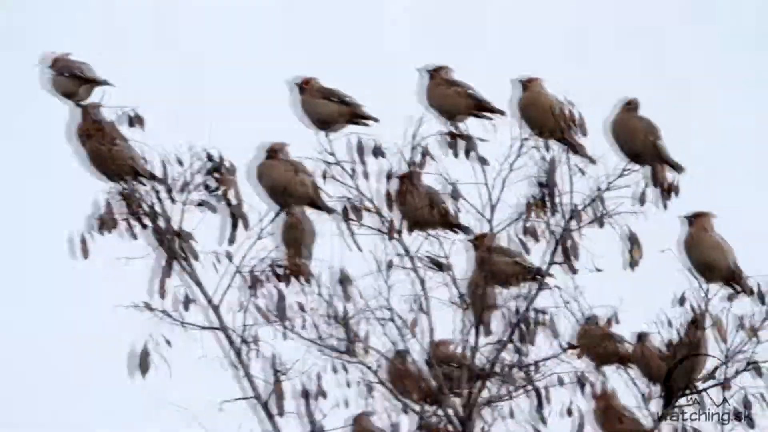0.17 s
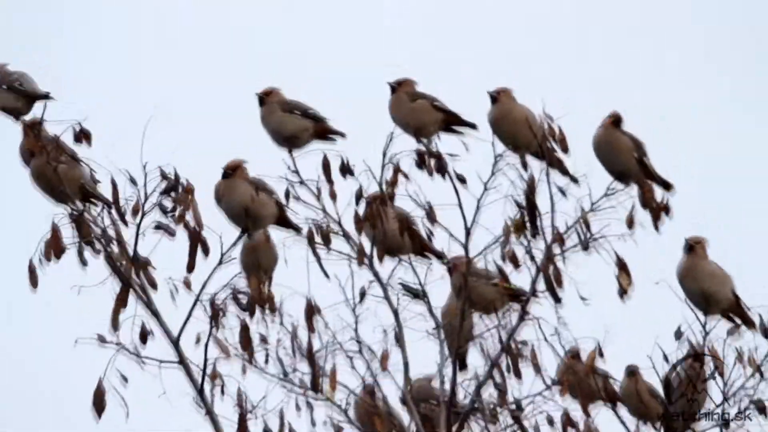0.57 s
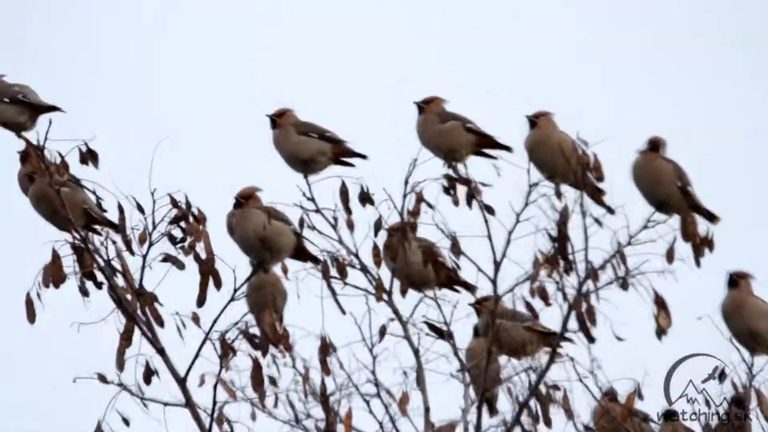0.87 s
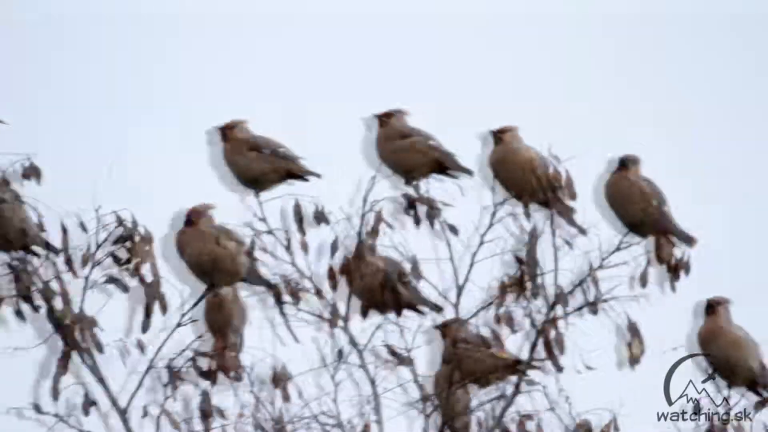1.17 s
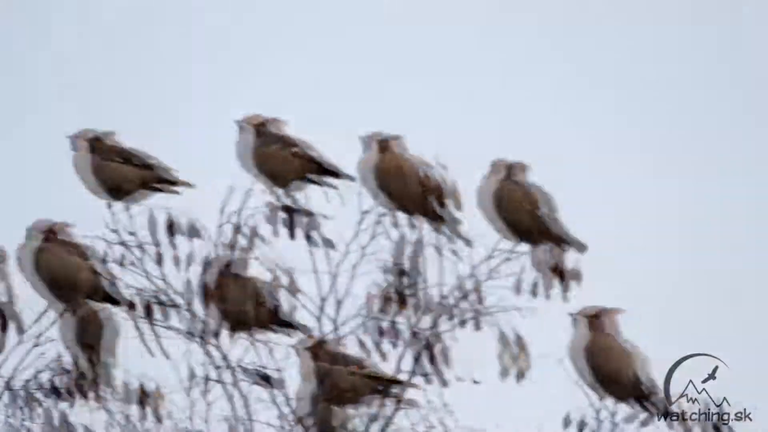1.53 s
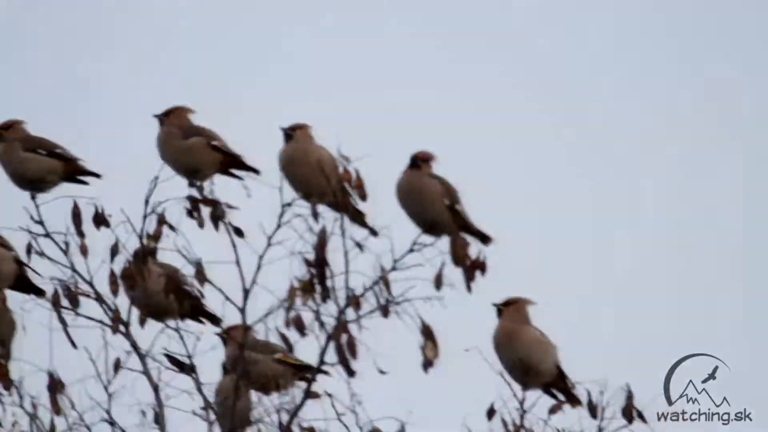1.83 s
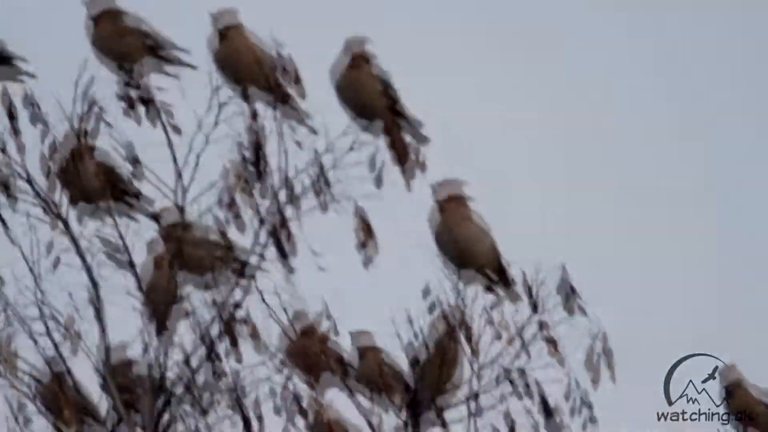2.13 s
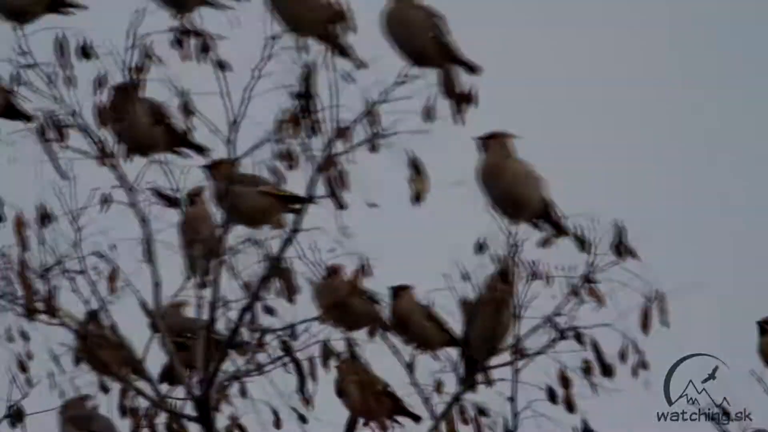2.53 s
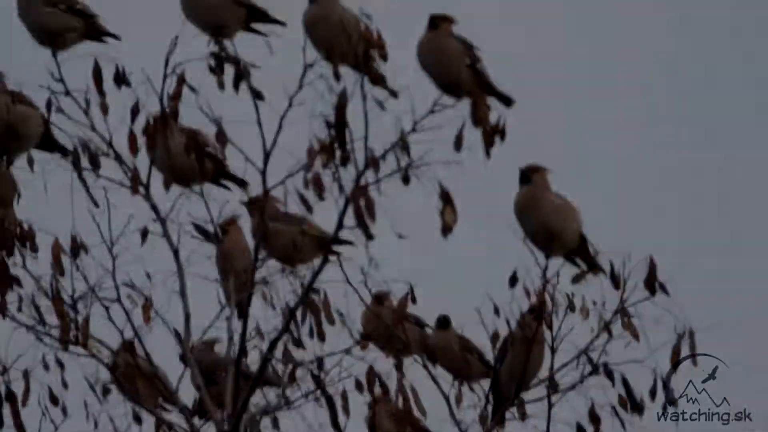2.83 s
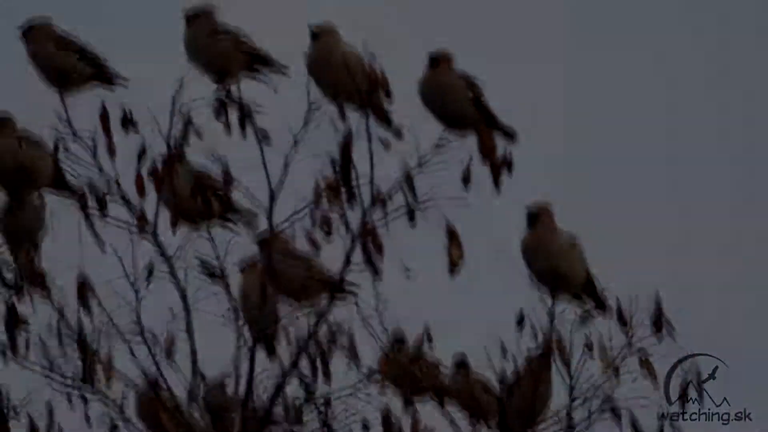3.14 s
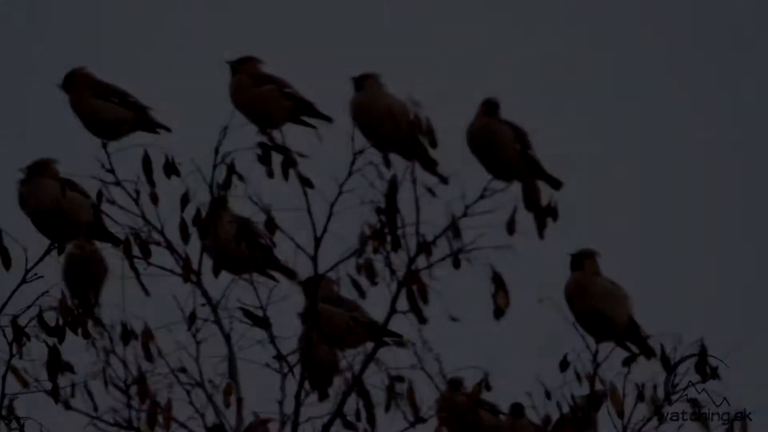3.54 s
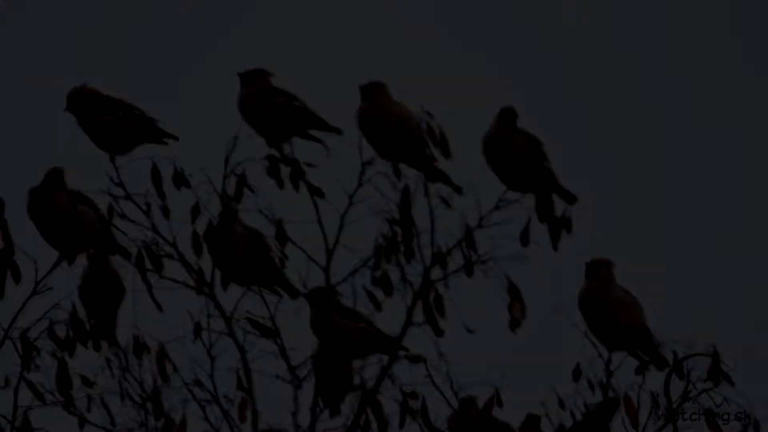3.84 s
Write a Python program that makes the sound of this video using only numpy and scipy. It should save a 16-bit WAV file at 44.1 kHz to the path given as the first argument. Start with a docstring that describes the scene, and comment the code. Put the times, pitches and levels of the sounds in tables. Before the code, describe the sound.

Thin, silvery bird trills overlap in a tree, with distant road noise, all fading away

```python
"""Waxwings in a treetop

A flock trills in a tree, in two-channel sound, over the wash of distant traffic and wind.
A trill is a run of thin whistled notes, about 18 a second: each flicks up and slides down.
The lower voices mostly end in a steep hook; the higher ones and the closing notes fade away.
One bird chatters in short falling chirps; band-passed noise makes twig ticks and rustles, coloured noise the air.
From 1.9 s on the whole sound is faded down."""
import sys
import numpy as np
from scipy import signal
from scipy.fft import rfft, irfft
from scipy.io import wavfile

SR = 44100
rng = np.random.default_rng(int(sys.argv[2]) if len(sys.argv) > 2 else 0)


def log_audio(samples):
    """Write samples as a 16-bit WAV file to the path given in sys.argv[1]."""
    # one column per channel
    frames = np.atleast_2d(samples).T
    # limit to full scale, then quantise
    limited = np.clip(frames, -1, 1)
    pcm = np.round(limited * 32767).astype(np.int16)
    wavfile.write(sys.argv[1], SR, pcm)


N = 176400   # samples: 4 s


def from_db(db):
    """Decibels to gain."""
    return 10 ** (np.asarray(db) / 20)


def rms_one(x):
    """Scale to unit power."""
    return x / np.sqrt(np.mean(x ** 2) + 1e-20)


def in_time(rows):
    """Read a (time, value) table at every sample."""
    return np.interp(np.arange(N) / SR, *np.transpose(rows))


def at_hz(points, hz):
    """Read a spectrum on a log-frequency axis."""
    point_hz, value = np.transpose(points)
    return np.interp(np.log(hz), np.log(point_hz), value)


def panned(db):
    """Left and right gains of unit mean power, db apart."""
    return rms_one(from_db([[db / 2], [-db / 2]]))


def drift(rate_hz, size):
    """Random wandering about zero: straight lines between normal draws, rate_hz draws a second."""
    steps = np.arange(size) * rate_hz / SR
    return np.interp(steps, np.arange(2000), rng.standard_normal(2000))


def band(x, low_hz, high_hz):
    """Band-pass made from a second-order Butterworth design."""
    edges_hz = [low_hz, min(high_hz, SR / 2 - 100)]
    return signal.sosfilt(signal.butter(2, edges_hz, "band", fs=SR, output="sos"), x)


def add(out, start_s, sound):
    """Mix a sound in at its time."""
    i = int(start_s * SR)
    out[:, i:i + sound.shape[-1]] += sound[..., :N - i]


RISE_S, RISE_HZ, ATTACK_S = .0055, 1700, .004   # the upward flick that opens a note, and its fade-in
HOOK_HZ_PER_S, HOOK_DROP_HZ, HOOK_WIDTH_S, HOOK_RASP_HZ = 370000, 2600, .0016, 200
WAVER_HZ, FLUTTER_DB, SWELL_DB = 32, 1.1, .9   # unsteadiness within a note: pitch, fast and slow level
BEAK_HZ, BEAK_WIDTH_HZ, BEAK_DB = 10700, 700, 7   # a resonance that lifts the octave partial
# The birds by place; "closing" is the near bird's last, dying note. Columns: left_minus_right_db, left_lead_ms,
# octave_db, sag_db (over a note), bend (of the slide, no unit), hook_db, hook_delay_s (to its peak), extra_echo_db
VOICES = {"near": (-2.5, .06, -25, 4.8, 1.8, -5.5, .0008, 2.5),
          "closing": (-2.5, .06, -26, 18, .7, -30, .001, -3),
          "back": (-4, .043, -18, 11, 1.3, -4.5, .003, 9), "high": (2.5, .104, -29, 3, .7, -20, .001, 5),
          "right": (-10, .006, -26, 9, .5, -25, .001, 0), "thin": (-2, .03, -3, 9, 1.2, 3, .0048, 0),
          "far": (-4, .14, -25, 26, 1, -4, .003, -2)}


def note(length_s, top_hz, end_hz, voice):
    """A near-pure whistle: flick up, sagging slide, then a steep rough drop, a hook or nearly silent by voice."""
    pan_db, lead_ms, octave_db, sag_db, bend, hook_db, hook_delay_s, _ = VOICES[voice]
    total_s = length_s + HOOK_DROP_HZ / HOOK_HZ_PER_S
    t = np.arange(int(total_s * SR)) / SR
    size = len(t)
    along = np.clip((t - RISE_S) / max(length_s - RISE_S, 1 / SR), 0, 1)
    after_s = np.maximum(t - length_s, 0)

    slide = np.expm1(-bend * along) / np.expm1(-bend)
    flick_hz = RISE_HZ * np.maximum(1 - t / RISE_S, 0) ** 2
    hz = top_hz + (end_hz - top_hz) * slide - flick_hz - HOOK_HZ_PER_S * after_s
    hz = hz + WAVER_HZ * (drift(700, size) + drift(100, size))
    hz = hz + HOOK_RASP_HZ * (after_s > 0) * drift(2000, size)

    unsteady_db = FLUTTER_DB * drift(400, size) + SWELL_DB * drift(80, size)
    edges = np.minimum(np.minimum(t, 2 * (total_s - t)) / ATTACK_S, 1)   # closes twice as fast as it opens
    envelope = np.sin(np.pi / 2 * edges) ** 2 * from_db(unsteady_db)
    whistle = from_db(-sag_db * along) * np.exp(-(after_s / HOOK_WIDTH_S) ** 2)
    hook = from_db(hook_db) / (1 + ((t - length_s - hook_delay_s) / HOOK_WIDTH_S) ** 2)
    beak_db = BEAK_DB / (1 + ((2 * hz - BEAK_HZ) / BEAK_WIDTH_HZ) ** 2)
    octave = whistle * from_db(octave_db + beak_db + sag_db * along / 2)   # sags half as much

    lead_cycles = hz * np.array([[lead_ms], [0]]) / 1000   # the left channel hears it first
    phase = 2 * np.pi * (np.cumsum(hz) / SR + lead_cycles)
    tone = np.hypot(whistle, hook) * np.sin(phase) + octave * np.sin(2 * phase)
    return panned(pan_db) * envelope * tone


CRACK_S, CRACK_HZ = .006, 310
# Moments when the voice cracks into a brief buzz: start_s (middle of the buzz)
VOICE_CRACKS = [2.818, 2.934]
# Trill notes in the treetop: start_s, slide_length_s, top_pitch_hz, end_pitch_hz, level_db (before flutter), voice
TRILL_NOTES = [ (.402, .007, 5100, 4900, -29, "near"), (.420, .039, 5450, 5150, -27.5, "near"),
               (.4725, .042, 6020, 5300, -21, "near"), (.5258, .045, 6150, 5220, -18, "near"),
               (.5822, .048, 6130, 5200, -16.5, "near"), (.6406, .046, 6250, 5200, -16.5, "near"),
               (.698, .041, 6000, 5320, -15.5, "near"), (.751, .043, 6000, 5130, -17, "near"),
               (.807, .038, 6080, 5240, -17, "near"), (.8584, .044, 6000, 5060, -19, "near"),
               (.914, .030, 5800, 4850, -20, "closing"), (.948, .036, 5900, 5300, -41, "back"),
               (.998, .039, 5950, 5300, -39, "back"), (1.052, .040, 6050, 5350, -39, "back"),
               (1.106, .040, 6050, 5350, -39, "back"), (1.158, .040, 6000, 5300, -39, "back"),
               (1.21, .030, 5950, 5350, -39.5, "back"), (1.295, .007, 5050, 4850, -39, "back"),
               (1.313, .035, 5650, 5250, -41, "back"), (1.361, .036, 6250, 5550, -33, "back"),
               (1.408, .041, 6300, 5500, -30, "back"), (1.458, .039, 6300, 5500, -30.5, "back"),
               (1.508, .042, 6250, 5450, -27, "back"), (1.562, .041, 6200, 5450, -33, "back"),
               (1.618, .040, 6200, 5350, -34, "back"), (1.671, .044, 6150, 5350, -31.5, "back"),
               (1.728, .013, 6050, 5850, -36, "high"), (1.395, .034, 6950, 6050, -31, "high"),
               (1.430, .042, 7100, 5900, -29, "high"), (1.480, .044, 7200, 5850, -26, "high"),
               (1.535, .046, 7100, 5850, -26, "high"), (1.594, .046, 7050, 5750, -25.5, "high"),
               (1.797, .022, 6750, 6050, -34, "right"), (1.830, .036, 7050, 6100, -30.5, "right"),
               (1.885, .043, 7050, 6050, -31, "right"), (1.944, .042, 7050, 6000, -34.5, "right"),
               (2.005, .046, 7050, 5950, -36, "right"), (2.334, .014, 6850, 6450, -22, "high"),
               (2.362, .034, 7100, 5950, -24.5, "high"), (2.414, .035, 7150, 5900, -21.5, "high"),
               (2.564, .011, 5100, 4900, -27, "near"), (2.593, .039, 5600, 5120, -26, "near"),
               (2.6453, .042, 6150, 5400, -21.5, "near"), (2.7015, .045, 6180, 5330, -18.5, "near"),
               (2.7592, .043, 6220, 5470, -15.5, "near"), (2.8135, .049, 6180, 5240, -16, "near"),
               (2.8755, .042, 6120, 5300, -16, "near"), (2.929, .041, 6160, 5260, -15.5, "near"),
               (2.9855, .035, 6150, 4950, -13, "closing"), (2.622, .040, 7050, 6200, -42, "right"),
               (2.668, .032, 7100, 6300, -42, "right"), (3.380, .008, 5900, 5500, -39, "thin"),
               (3.400, .039, 5550, 5150, -38, "thin"), (3.452, .043, 6050, 5350, -40, "thin"),
               (3.508, .043, 6100, 5350, -38, "thin"), (3.566, .041, 6100, 5400, -34, "thin"),
               (3.622, .039, 6100, 5400, -35, "thin"), (3.677, .042, 6000, 5300, -38, "thin"),
               (3.732, .042, 6000, 5300, -38, "thin"), (3.436, .043, 6100, 5400, -30, "far"),
               (3.491, .041, 6100, 5450, -31, "far"), (3.545, .042, 6150, 5450, -29.5, "far"),
               (3.600, .040, 6150, 5450, -30, "far"), (3.654, .041, 6100, 5450, -29.5, "far"),
               (3.709, .038, 6050, 5450, -33, "far"), (3.762, .036, 6000, 5400, -37, "far")]


def trills():
    """Whistled notes of the flock: what comes straight, and what goes into the branches."""
    direct, sent = np.zeros((2, N)), np.zeros((2, N))
    for start_s, length_s, top_hz, end_hz, level_db, voice in TRILL_NOTES:
        sound = from_db(level_db) * note(length_s, top_hz, end_hz, voice)
        extra_echo_db = VOICES[voice][-1]
        add(direct, start_s, sound)
        add(sent, start_s, from_db(extra_echo_db) * sound)
    t = np.arange(N) / SR
    cracking = sum(np.exp(-((t - when_s) / CRACK_S) ** 2) for when_s in VOICE_CRACKS)
    beating = np.sin(2 * np.pi * CRACK_HZ * t) + np.sin(6 * np.pi * CRACK_HZ * t) / 2
    buzz = 1 - cracking * beating   # shakes the level of every note sounding then
    return direct * buzz, sent * buzz


CHIRP_S, CHIRP_FALL_OCTAVES, CHIRP_RASP_HZ = .010, .48, 220
# Quick falling chirps of one bird: start_s, middle_pitch_hz, level_db
CHIRPS = [(1.674, 2600, -33), (1.692, 4300, -34), (1.696, 2650, -33), (1.701, 4750, -33),
          (1.712, 4200, -33), (1.720, 4700, -34), (1.738, 4650, -34), (1.749, 4650, -34),
          (1.756, 4650, -33), (1.766, 3900, -35), (1.771, 2650, -33), (1.778, 4700, -35),
          (1.794, 4700, -32), (1.811, 2400, -31), (1.813, 4650, -36), (1.831, 2350, -33)]


def chatter():
    """A dry rattle of very short, raspy falling chirps in two registers."""
    out, along = np.zeros((2, N)), np.linspace(0, 1, int(CHIRP_S * SR))
    for start_s, middle_hz, level_db in CHIRPS:
        hz = middle_hz * 2 ** (CHIRP_FALL_OCTAVES * (.5 - along))
        hz = hz + CHIRP_RASP_HZ * drift(1500, len(along))
        envelope = from_db(level_db) * np.sin(np.pi * along) ** 2
        add(out, start_s, envelope * np.sin(2 * np.pi * np.cumsum(hz) / SR))
    return out * panned(db=-3)


TICK_T60_S, TICK_LOW_HZ, TICK_HIGH_HZ = .018, 6500, 11000
# Twig ticks: start_s, level_db (of the noise before its band-pass and doubling)
TWIG_TICKS = [(.1366, -33), (.2978, -31), (.3776, -26)]


def twigs():
    """Dry, bright ticks: bursts of noise that die at once."""
    out, t = np.zeros((2, N)), np.arange(SR // 20) / SR
    for start_s, level_db in TWIG_TICKS:
        crack = rng.standard_normal((2, len(t))) * from_db(level_db - 60 * t / TICK_T60_S)
        add(out, start_s, 2 * band(crack, TICK_LOW_HZ, TICK_HIGH_HZ))
    return out


# Wings and dry seed pods: middle_s, half_length_s, low_hz, high_hz, level_db (before its wavering)
WING_RUSTLES = [(.025, .045, 4500, 14000, -39), (3.095, .03, 7000, 10500, -47),
                (3.15, .045, 2600, 4600, -39), (3.195, .035, 5200, 6600, -43)]


def rustles():
    """Soft, grainy swells of band-passed noise."""
    out, t = 0, np.arange(N) / SR
    for middle_s, half_s, low_hz, high_hz, level_db in WING_RUSTLES:
        swell = np.exp(-((t - middle_s) / half_s) ** 2) * from_db(level_db + 2.5 * drift(300, N))
        out = out + swell * rms_one(band(rng.standard_normal((2, N)), low_hz, high_hz))
    return out


def scatter(x, level_db, t60_s):
    """Many weak reflections, as decaying noise, different in each channel."""
    t = np.arange(SR // 2) / SR
    decay = from_db(-60 * t / t60_s) * (1 - np.exp(-10 * t / t60_s))
    echoes = rng.standard_normal((2, len(t))) * decay
    echoes = echoes / np.sqrt(np.sum(echoes ** 2, axis=1, keepdims=True))
    return from_db(level_db) * signal.fftconvolve(x, echoes, axes=1)[:, :N]


DISTANT_NOTES_PER_S, DISTANT_DB, DISTANT_TOP_HZ = 30, -48, 6400   # level of the strongest, middle top pitch


def distant_flock():
    """The rest of the flock, further off: faint notes at random, heard only as a blur of reflections."""
    out = np.zeros((2, N))
    for when, pitch, softness in rng.random((int(DISTANT_NOTES_PER_S * N / SR), 3)):
        top_hz = DISTANT_TOP_HZ * (.92 + .16 * pitch)
        sound = note(.04, top_hz, .88 * top_hz, "high")
        add(out, when * N / SR, from_db(DISTANT_DB - 5 * softness) * sound)
    return scatter(out, level_db=0, t60_s=.2)


# Likeness of the two channels in open air: pitch_hz, correlation (no unit)
CHANNEL_LIKENESS = [(60, .2), (130, .92), (290, .96), (640, .7), (1400, .38), (3000, .08), (15000, 0)]
# Lean of the open air to one side: pitch_hz, left_minus_right_db
AIR_LEAN = [(60, 0), (200, -1.5), (380, -1.5), (700, -4.5), (1300, -2), (2400, -4.5), (4400, -2.5),
            (8000, -.5)]


def air_noise(spectrum, top_hz):
    """Coloured stereo noise, its channels most alike in the low range and unrelated at the very top."""
    hz = np.maximum(np.arange(N // 2 + 1) * SR / N, 1)
    mid, side = rfft(rng.standard_normal((2, N)))
    alike = np.clip(at_hz(CHANNEL_LIKENESS, hz), -1, 1)
    signs = np.array([[1], [-1]])   # left, right
    colour_db = at_hz(spectrum, hz) + signs * at_hz(AIR_LEAN, hz) / 2
    colour = from_db(colour_db) / np.sqrt(1 + (hz / top_hz) ** 10)
    pair = np.sqrt(1 + alike) * mid + np.sqrt(1 - alike) * side * signs
    return rms_one(irfft(colour * pair, N))


DRONE_HZ, DRONE_WIDTH_HZ, DRONE_DB = 340, 30, -21   # level relative to the wash
TYRE_LOW_HZ, TYRE_HIGH_HZ = 950, 1500
# Colour of the distant traffic wash: pitch_hz, level_db (relative)
WASH_COLOUR = [(25, -39), (70, -33), (100, -25), (145, -17.5), (200, -9.5), (260, -3), (330, -.5),
               (450, -1.5), (600, -1.6), (900, -2.6), (1100, -4.7), (1500, -5.5), (2500, -9), (3200, -13),
               (4500, -17)]
# Course of the wash before the fade: start_s, level_db
WASH_COURSE = [(0, -31), (.4, -31.5), (.9, -32.5), (1.3, -34.5), (1.9, -35.3), (2.6, -36)]
# Course of the tyre noise, growing before the fade: start_s, level_db
TYRE_COURSE = [(0, -54), (2.2, -52), (2.8, -44), (3.3, -42)]
# Colour of the treetop's airy hiss: pitch_hz, level_db (relative)
HISS_COLOUR = [(2500, -10), (3700, 2), (4400, 2.5), (5200, 0), (7000, -3.5), (10500, -3), (12500, -10),
               (15500, -12)]
# Course of the hiss before its wavering and the fade: start_s, level_db
HISS_COURSE = [(0, -41.5), (.9, -42), (1.3, -45.5), (1.9, -45), (3, -45), (4, -46)]


def background():
    """Noise of distant traffic with a faint hum and tyre noise in it, and airy hiss above."""
    drone = band(rng.standard_normal(N), DRONE_HZ - DRONE_WIDTH_HZ / 2, DRONE_HZ + DRONE_WIDTH_HZ / 2)
    traffic = air_noise(WASH_COLOUR, top_hz=4200) + from_db(DRONE_DB) * rms_one(drone)
    wash = from_db(in_time(WASH_COURSE)) * traffic
    tyre_noise = band(air_noise(WASH_COLOUR, top_hz=4200), TYRE_LOW_HZ, TYRE_HIGH_HZ)
    tyres = from_db(in_time(TYRE_COURSE)) * rms_one(tyre_noise)
    hiss_db = in_time(HISS_COURSE) + .7 * drift(25, N)
    return wash + tyres + from_db(hiss_db) * air_noise(HISS_COLOUR, top_hz=18000)


CHATTER_ECHO_DB = 8   # extra chatter sent into the branches
EARLY_DB, EARLY_T60_S, TAIL_DB, TAIL_T60_S = -15, .035, -22, .16   # branches, then the surroundings


def scene():
    """The flock in its tree, in the open air."""
    (song, sent), rattle, ticks = trills(), chatter(), twigs()
    sent = sent + from_db(CHATTER_ECHO_DB) * rattle + ticks
    branches = scatter(sent, EARLY_DB, EARLY_T60_S)
    surroundings = scatter(sent, TAIL_DB, TAIL_T60_S)
    tree = song + rattle + ticks + branches + surroundings
    return tree + rustles() + distant_flock() + background()


CUTOFF_HZ = 15750
# Fade of the whole sound: start_s, level_db
FADE_COURSE = [(0, 0), (1.9, 0), (2.35, -6), (2.75, -11), (3.1, -14), (3.5, -17.5), (3.8, -22), (4, -26)]


def record(dry):
    """The sound is faded down and the top is cut by a steep low-pass."""
    low_pass = signal.ellip(12, .1, 80, CUTOFF_HZ, fs=SR, output="sos")   # ripple and stop-band in dB
    return signal.sosfilt(low_pass, dry * from_db(in_time(FADE_COURSE)))


dry = scene()
out = record(dry)
log_audio(out)
```